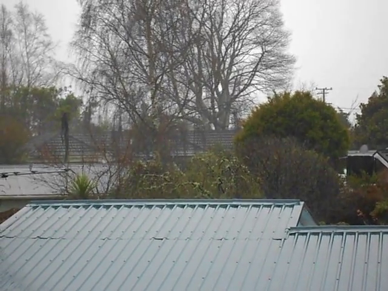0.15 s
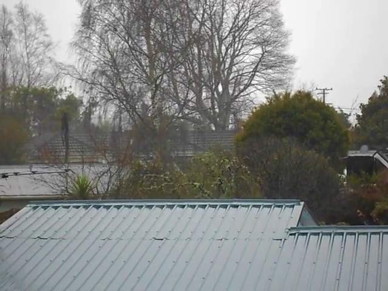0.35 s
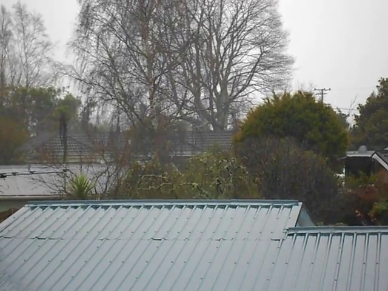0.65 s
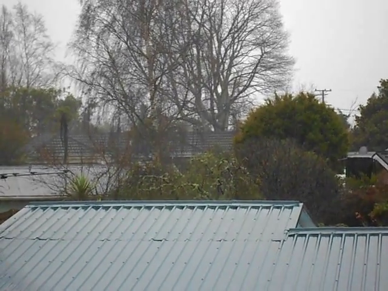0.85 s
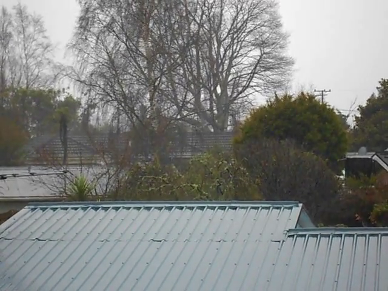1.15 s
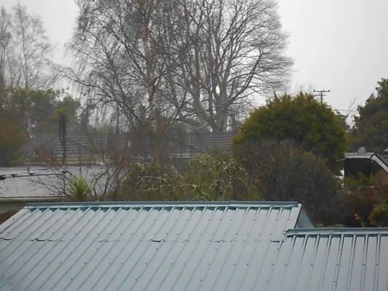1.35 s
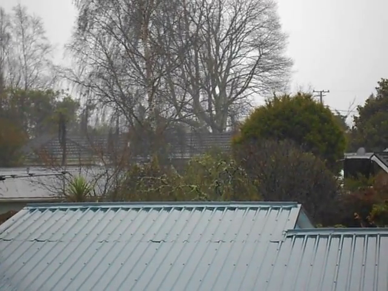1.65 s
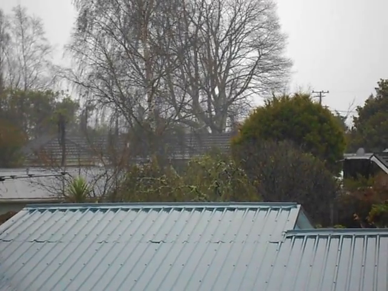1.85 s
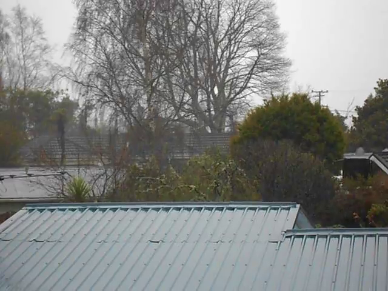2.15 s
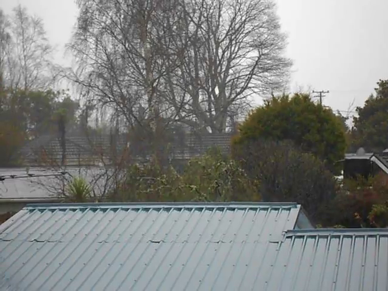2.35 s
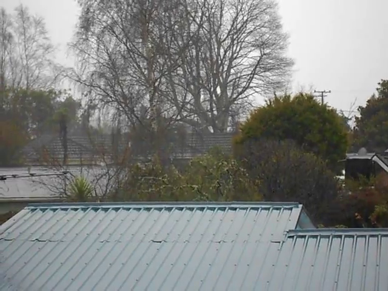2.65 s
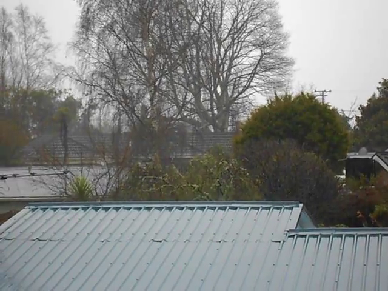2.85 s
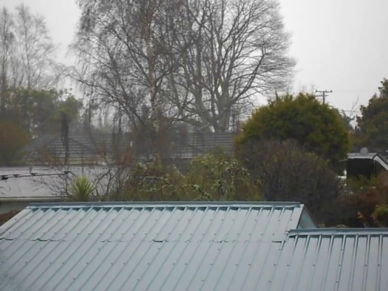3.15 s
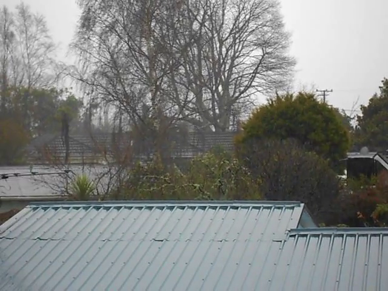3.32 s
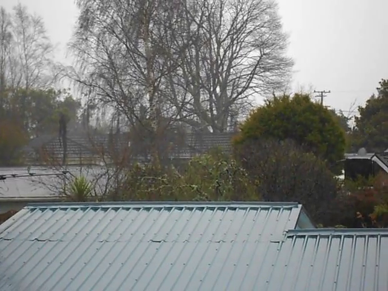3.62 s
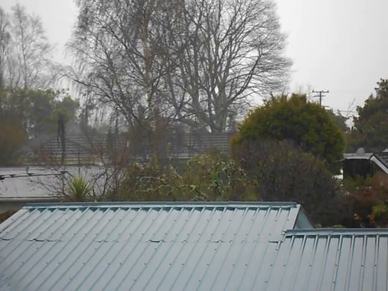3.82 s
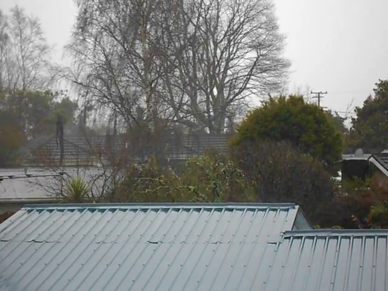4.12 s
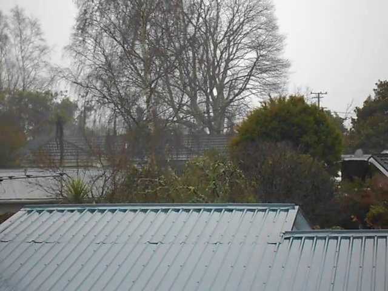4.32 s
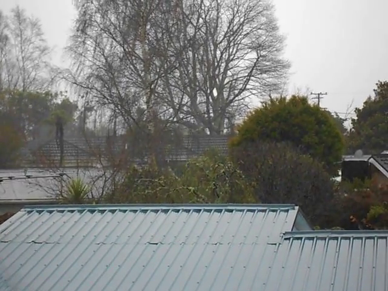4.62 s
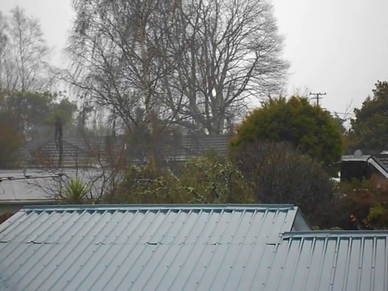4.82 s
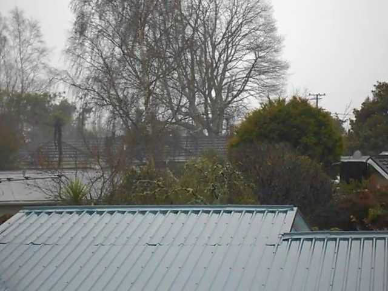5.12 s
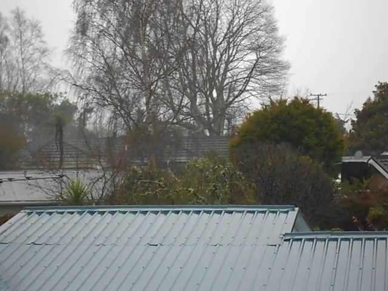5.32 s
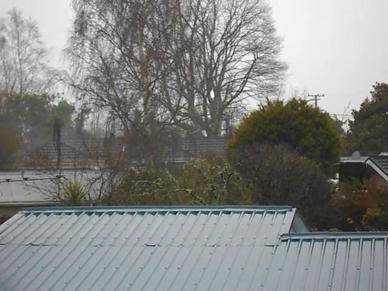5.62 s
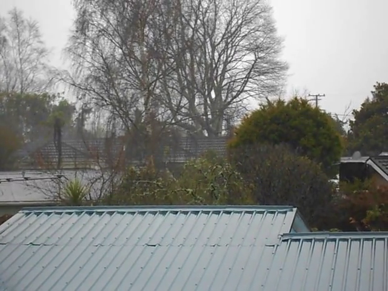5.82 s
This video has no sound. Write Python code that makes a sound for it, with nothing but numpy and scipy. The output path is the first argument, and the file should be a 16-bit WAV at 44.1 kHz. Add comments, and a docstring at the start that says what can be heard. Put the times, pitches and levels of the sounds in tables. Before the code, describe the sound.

Heavy rain drums and hisses steadily on corrugated metal roofs, while wind gusts rumble and thump on the microphone.

```python
"""Heavy rain drums and hisses on corrugated metal roofs, heard from a little above them.
Drops make the roof panels ring, and countless splashes blend into the hiss. Gusts of wind rumble
and thump on the microphone, and a few drops tick close by. The hardest gusts and the nearest drop
make the camera turn its volume down, and the rain swells back after each."""
import sys
import numpy as np
from scipy import signal
from scipy.fft import rfft, irfft, next_fast_len
from scipy.io import wavfile
from scipy.ndimage import uniform_filter1d, minimum_filter1d, map_coordinates

SR = 44100
rng = np.random.default_rng(int(sys.argv[2]) if len(sys.argv) > 2 else 0)


def master_out(mix):
    """Clip the mix to full scale and print it as 16-bit PCM to the path in sys.argv[1]."""
    frames = np.transpose(np.atleast_2d(mix))
    ceiling = np.clip(frames, -1, 1)
    pcm = np.round(ceiling * 32767).astype(np.int16)
    wavfile.write(sys.argv[1], SR, pcm)


N = 263314


def amp(db):
    """Turn decibels into a number to multiply a sound by."""
    return 10 ** (np.asarray(db) / 20)


def unit(x):
    """Scale a sound so that its average size (rms) is 1."""
    return x / np.sqrt(np.mean(x ** 2) + 1e-20)


def wobble(rate):
    """A smooth curve through `rate` random values a second."""
    return map_coordinates(rng.standard_normal(200), [np.arange(N) * rate / SR], mode="mirror")


def filtered(x, response):
    """Multiply each frequency in x by what response(hz) gives for it."""
    size = next_fast_len(N + SR // 4)
    return irfft(rfft(x, size) * response(np.fft.rfftfreq(size, 1 / SR)), size)[:N]


def coloured(x, points):
    """Shape the tone of x along a curve of (frequency [Hz], level [dB]) points."""
    point_hz, db = np.transpose(points)
    return filtered(x, lambda hz: amp(np.interp(np.log(hz + 1), np.log(point_hz), db)))


def impacts(rate, spread_db):
    """Drops of mixed sizes land at random, about `rate` a second, one click each."""
    lands = rng.random(N) < rate / SR
    size = amp(spread_db * np.clip(rng.standard_normal(N), -2, 2))
    return lands * size * np.sign(rng.standard_normal(N))


def ringing(hits, fade_s):
    """Each hit sets off a noisy ring that dies away by 60 dB in fade_s seconds."""
    t = np.arange(SR // 4) / SR
    ring = rng.standard_normal(len(t)) * amp(-60 * t / fade_s)
    return unit(signal.fftconvolve(hits, ring)[:N])


# The tone of all the roof panels together: (frequency [Hz], level [dB])
PANEL_TONE = [(30, -43), (100, -12.5), (220, -6), (330, -6.5), (450, -7), (620, -0.5), (850, -1.3),
              (1120, -3.5), (1350, -6.5), (1650, -15), (2500, -18.5), (6000, -60)]
# The low notes the nearest metal sheet rings at: (frequency [Hz], width [Hz], level [dB])
ROOF_NOTES = [(183, 14, -13), (230.6, 26, 8), (256, 11, -5), (360.3, 6.6, 10.5), (635, 16, 8)]


def drumming(panel_count=60):
    """Drops strike many roof panels, each with its own ring; the nearest roof adds its low notes."""
    def roof_response(hz):
        return sum(amp(db) * 1j * hz * width / (note * note - hz * hz + 1j * hz * width)
                   for note, width, db in ROOF_NOTES)

    panels = sum(ringing(impacts(rate=120, spread_db=4), fade_s=0.054) for _ in range(panel_count))
    near_roof = unit(filtered(impacts(rate=900, spread_db=10), roof_response))
    return unit(coloured(panels, PANEL_TONE)) + amp(-17) * near_roof


# The tone of splashing water: (frequency [Hz], level [dB])
SPLASH_TONE = [(400, -53), (1300, -2), (1700, -2.5), (2150, 2), (2800, 0), (3400, 0), (4000, -2),
               (5000, -2.5), (5600, -4.5), (6000, -3.5), (6800, -5.5), (10000, -7), (13000, -19.5)]


def splashing():
    """Countless far splashes merge into a hiss; nearer ones patter through it."""
    far = rng.standard_normal(N) * amp(0.13 * wobble(17))
    near = ringing(impacts(rate=1200, spread_db=3.5), fade_s=0.0095)
    spray = unit(impacts(rate=2800, spread_db=3.5))
    return unit(coloured(far + amp(-11.0) * near + amp(-6.5) * spray, SPLASH_TONE))


# How the rain's loudness dips and comes back: (time [s], level change [dB])
RAIN_LEVEL = [(0, -0.6), (0.55, 1), (0.85, 0.5), (1.3, -2.1), (1.6, -0.8), (1.9, -0.7), (2.35, 0.9),
              (2.8, -1.5), (3.05, -1.1), (3.45, 0.15), (4.15, -1.05), (4.6, 0.3), (4.85, -0.3), (5.25, 1),
              (5.97, -0.3)]


def rain(drum_db=-19, splash_db=-22.5, waver_db=0.15):
    """Drumming plus splashing; their shared loudness dips, comes back and wavers a little at random."""
    times, change_db = np.transpose(RAIN_LEVEL)
    level_db = np.interp(np.arange(N) / SR, times, change_db) + waver_db * wobble(5)
    roofs = amp(drum_db + 0.37 * wobble(5.1)) * drumming()
    splashes = amp(splash_db) * splashing()
    return amp(level_db) * (roofs + splashes)


# Gusts reaching the microphone: (time [s], length [s], level [dB])
WIND_GUSTS = [(0.018, 0.082, -18), (0.725, .035, -16), (0.851, .04, -13), (1.0, 0.19, -20.5),
              (1.237, .05, -21), (1.523, 0.11, -18), (1.752, 0.1, -22), (2.543, 0.12, -18),
              (2.73, 0.11, -19.5), (2.885, 0.17, -23.5), (3.035, 0.058, -13.5), (3.798, 0.11, -23.5),
              (4.236, 0.037, -29), (4.41, .05, -31), (5.104, 0.054, -24), (5.575, 0.11, -24.5),
              (5.807, 0.15, -25)]


def wind_strength(breeze_db=-35.5, rise_s=0.02, fall_s=0.046):
    """The wind's level in dB: each gust rises, holds and dies back into a light, wavering breeze."""
    t = np.arange(N) / SR
    level = amp(breeze_db + 2.1 * wobble(9))
    for start, length, db in WIND_GUSTS:
        rise = np.clip((t - start) / rise_s, 0, 1)
        fall = np.exp(-np.maximum(t - start - length, 0) / fall_s)
        level = np.maximum(level, amp(db) * rise * fall)
    return 20 * np.log10(level)


# The tone of wind rumbling on the microphone: (frequency [Hz], level [dB])
RUMBLE_TONE = [(8, -25), (25, 7), (55, -0.5), (100, -6), (170, -13), (300, -21), (700, -20), (2000, -80)]
# The tone of small swirls of air: (frequency [Hz], level [dB])
SWIRL_TONE = [(30, -12), (80, 5.5), (160, 1), (350, -21), (1200, -35)]


def wind(strong_gust_db=-16, swirl_growth=1.35):
    """Wind rumbles on the microphone; strong gusts break into small swirls that flutter raggedly."""
    strength_db = wind_strength()
    rumble = unit(coloured(rng.standard_normal(N), RUMBLE_TONE))
    rumble = unit(np.tanh(0.71 * rumble))  # round off the biggest swings
    flutter = rng.standard_normal(N) * amp(4.2 * wobble(30))
    swirls = unit(coloured(flutter, SWIRL_TONE))
    swirl_db = -26 + swirl_growth * (strength_db - strong_gust_db)  # grows faster than the gust itself
    return amp(strength_db) * rumble + amp(swirl_db) * swirls


# Hard thumps of air in the strongest gusts: (time [s], peak level [dB], push length [s])
WIND_THUMPS = [(0.7498, -1.5, 0.0026), (1.046, -5.5, 0.0025), (1.123, -6.5, 0.002), (1.656, -4, .0018),
               (2.529, -3.5, 0.0024), (3.055, -3.5, .0035), (3.09, -7, 0.0027), (3.116, 1, 0.002)]


def wind_thumps():
    """Air hits the microphone with one quick push, then a slower pull."""
    out = np.zeros(N + SR)
    t = np.arange(SR // 10) / SR
    for start, db, push_s in WIND_THUMPS:
        age = t / push_s  # the push turns into a pull at 2
        pressure = age * (2 - age) * np.exp(-age)
        out[round(start * SR):][:len(t)] += amp(db) * pressure / pressure.max()
    return out[:N]


# Drops landing close to the microphone: (time [s], level [dB])
CLOSE_DROPS = [(1.3445, -8), (1.3485, -7.5), (3.4865, -9.5), (4.2278, -6), (4.6826, 3)]


def close_drops(faint_count=22, pitch_hz=9500, rise_s=0.00021):
    """A close drop makes a sharp, high tick, then a little spatter; fainter drops land at random."""
    out = np.zeros(N + SR)
    t = np.arange(SR // 40) / SR
    age = t / rise_s
    tick = age ** 2 * np.exp(1 - age ** 2)
    spatter_db, delay_s, fade_s = -14, 0.0025, 0.035
    spatter_level = (t > delay_s) * amp(spatter_db - 60 * (t - delay_s) / fade_s)
    faint_db, spread_db = -16.5, 3
    faint_drops = [(rng.random() * N / SR, rng.normal(faint_db, spread_db)) for _ in range(faint_count)]
    for start, db in list(CLOSE_DROPS) + faint_drops:
        spatter = spatter_level * unit(uniform_filter1d(rng.standard_normal(len(t)), size=16))
        drop = (tick + spatter) * np.sin(2 * np.pi * pitch_hz * t)
        out[round(start * SR):][:len(t)] += amp(db) * drop
    return out[:N]


def scene():
    """Rain on the roofs, close drops and wind all meet at one microphone."""
    return (rain() + close_drops() + wind() + wind_thumps())[None]


def automatic_volume(x, ceiling_db, hold_s, release_s, start_cut_db):
    """A peak over the ceiling turns the volume down at once; it stays down briefly, then creeps back."""
    excess_db = np.maximum(20 * np.log10(np.abs(x) + 1e-9) - ceiling_db, 1e-6)
    excess_db[0] = start_cut_db  # the volume is still low from an earlier gust
    half_hold = int(hold_s * SR / 2)
    held_db = -minimum_filter1d(-excess_db, 2 * half_hold + 1, origin=half_hold, mode="nearest")
    fade = np.arange(N) / SR / release_s
    # each cut shrinks away until a bigger one takes over
    cut_db = np.exp(np.maximum.accumulate(np.log(held_db) + fade) - fade)
    early_cut_db = -minimum_filter1d(-cut_db, size=45)  # start turning down just before the peak
    return x * amp(-uniform_filter1d(early_cut_db, size=45))


# How the microphone dulls the highest sounds: (frequency [Hz], level [dB])
MIC_TONE = [(10100, 0), (10500, -2.5), (11000, -11.5), (11700, -8), (12000, -20)]


def record(dry):
    """The camera adjusts its volume, thins the deepest rumble, dulls the highs and cuts off the top."""
    low_cut_hz, top_hz = 16, 12069
    levelled = automatic_volume(dry[0], ceiling_db=-4.0, hold_s=0.075, release_s=0.44, start_cut_db=5.0)
    dulled = coloured(levelled, MIC_TONE)
    return filtered(dulled, lambda hz: hz / np.hypot(hz, low_cut_hz) * (hz < top_hz))[None]


dry = scene()
out = record(dry)
master_out(out)
```